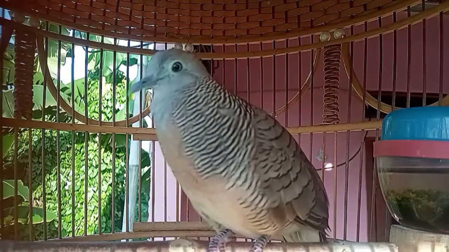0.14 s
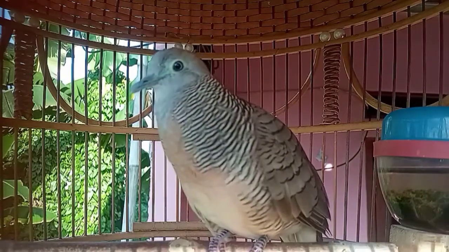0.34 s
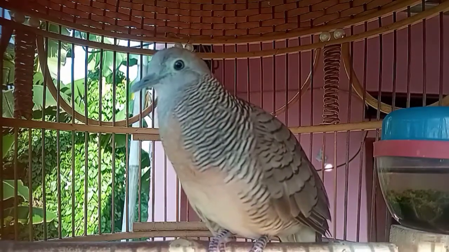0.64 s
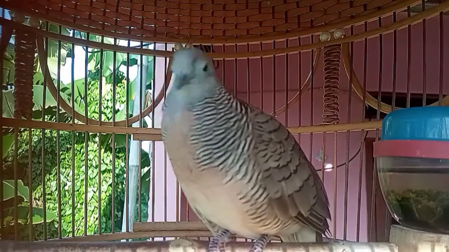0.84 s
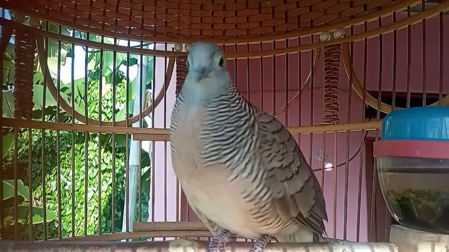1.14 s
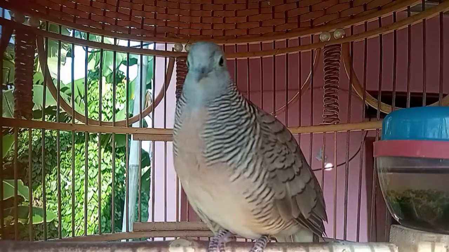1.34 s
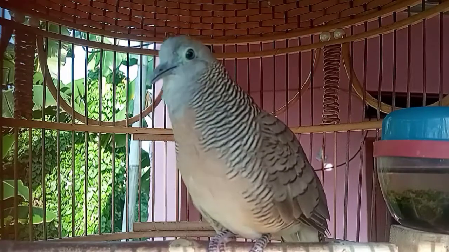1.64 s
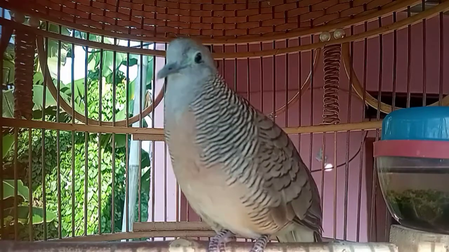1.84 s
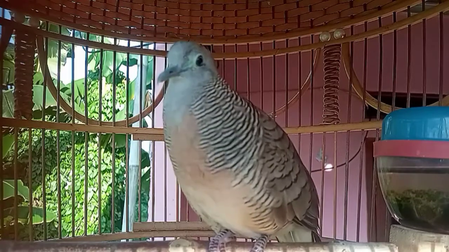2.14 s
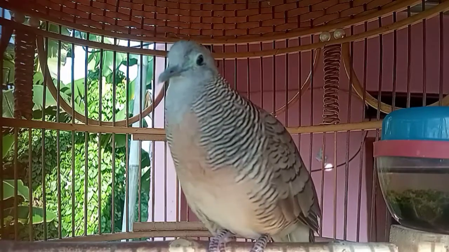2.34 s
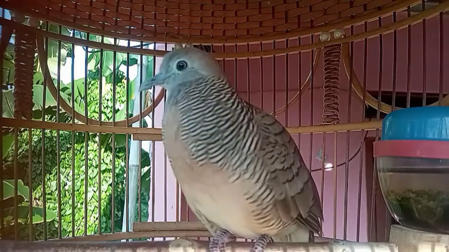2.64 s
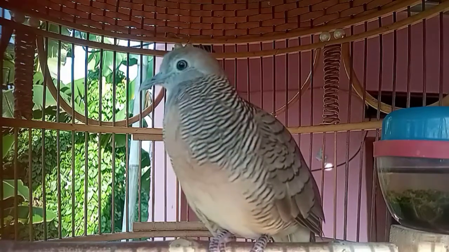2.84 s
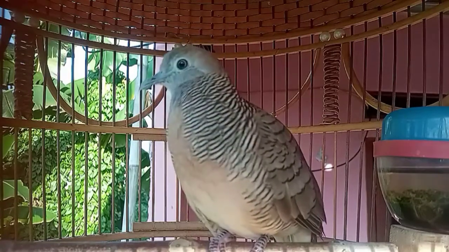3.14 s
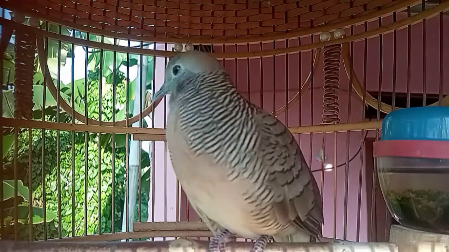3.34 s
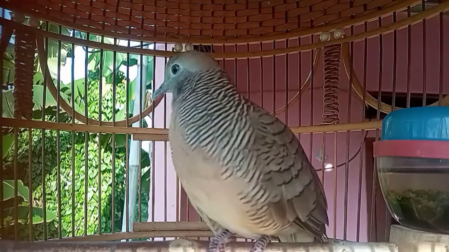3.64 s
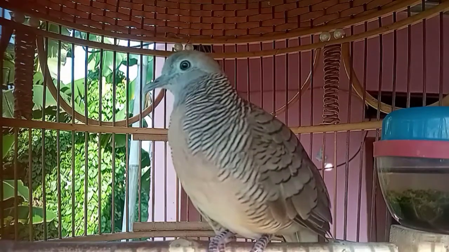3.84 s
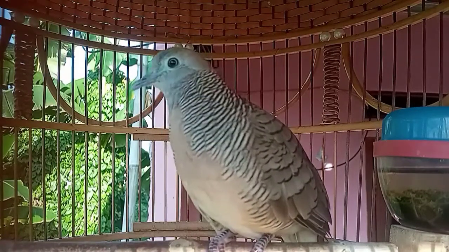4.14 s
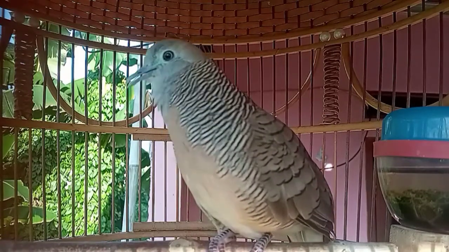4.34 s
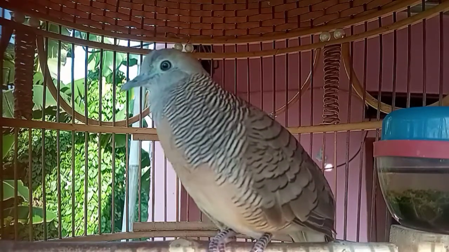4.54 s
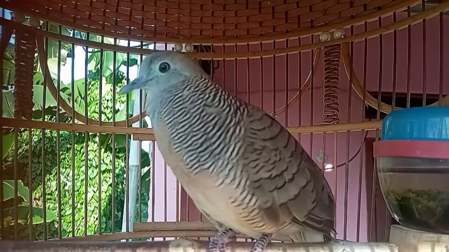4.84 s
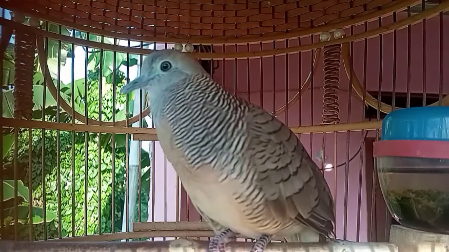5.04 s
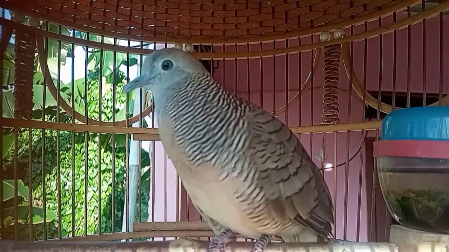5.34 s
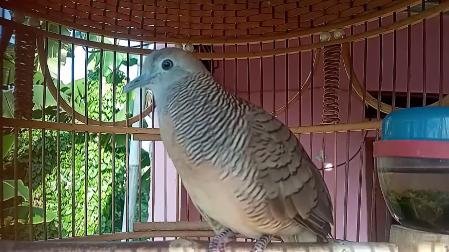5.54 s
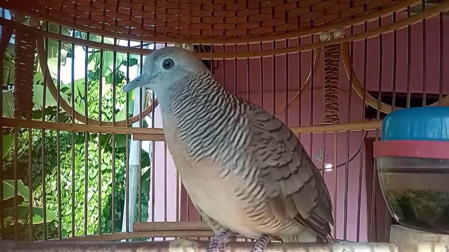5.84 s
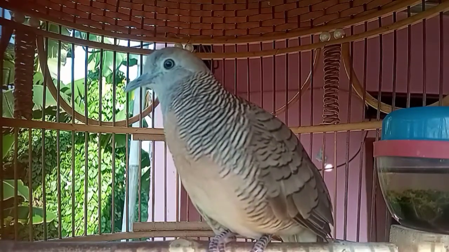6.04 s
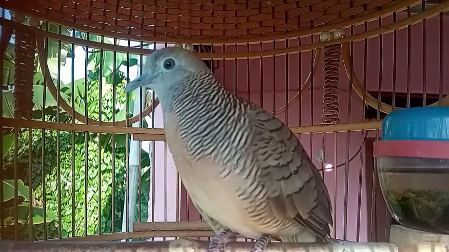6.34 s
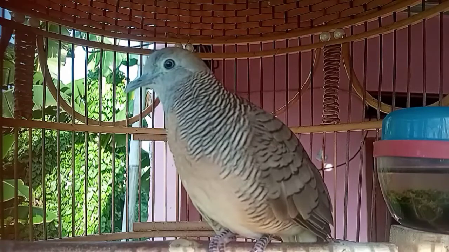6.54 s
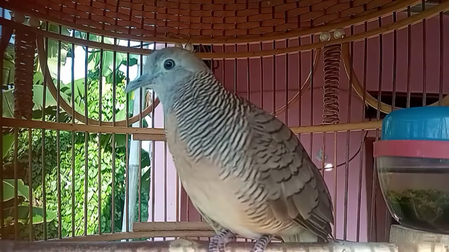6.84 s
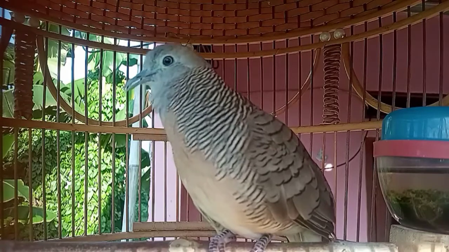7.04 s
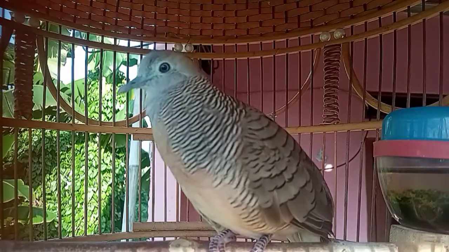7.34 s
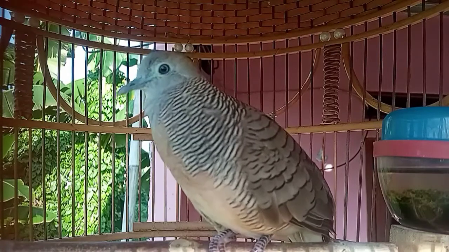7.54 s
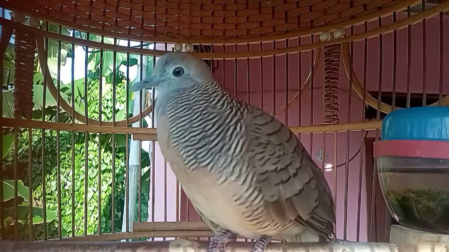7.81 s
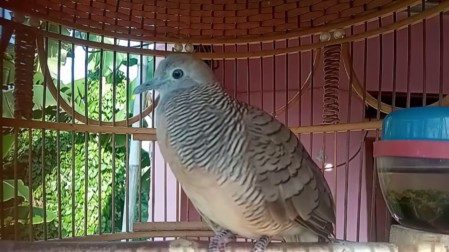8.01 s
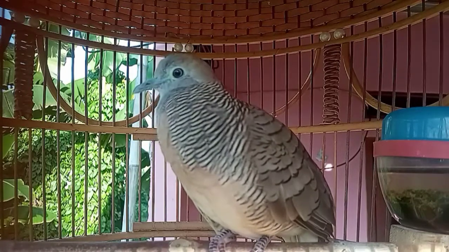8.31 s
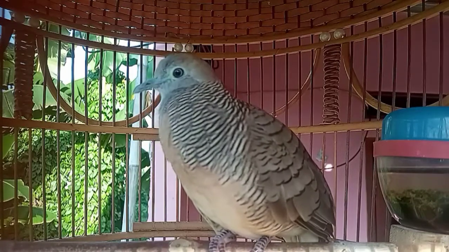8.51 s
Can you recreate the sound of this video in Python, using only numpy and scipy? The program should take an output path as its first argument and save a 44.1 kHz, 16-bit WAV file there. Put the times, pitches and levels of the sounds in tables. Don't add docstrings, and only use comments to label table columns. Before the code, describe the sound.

Under a porch, a caged zebra dove sings close to a stereo microphone: three clipped four-note phrases, each rising from a creak into a clear hollow tone. A neighbouring dove patters fast even coos before the first phrase and again after the second. Farther doves answer with echo, small birds chirp and twitter high up, two bands of cicadas buzz steadily, an engine hums far off, and the cage ticks lightly.

```python
import sys
import numpy as np
from scipy import signal
from scipy.fft import rfft, irfft, next_fast_len
from scipy.io import wavfile
from scipy.ndimage import uniform_filter1d, minimum_filter1d, map_coordinates

SR = 44100
rng = np.random.default_rng(int(sys.argv[2]) if len(sys.argv) > 2 else 0)


def attenuation_scalar(level_db):
    decades = np.asarray(level_db, float) / 20
    return 10 ** decades


def store_pcm(level_fs):
    pcm = np.round(np.clip(level_fs, -1, 1) * 32767).astype(np.int16)
    wavfile.write(sys.argv[1], SR, np.atleast_2d(pcm).T)


N = 382347

# (time [s], high cicada [dB], low choir [dB], engine [dB], yard [dB])
BEDS = [(0.0, -38, -44, -62, -91), (2.73, -38, -41.5, -51, -98), (3.33, -37.5, -44, -51, -95.5),
        (6.98, -38.5, -43.5, -54, -89), (8.67, -38, -45.5, -49.5, -86.5)]


def unit(x):
    return x / np.sqrt(np.mean(x ** 2) + 1e-20)


def along(points, hz):
    f, v = np.transpose(points)
    return np.interp(np.log(hz + 1), np.log(f + 1), v)


def curves(rows):
    s, *cols = np.transpose(rows)
    return [np.interp(np.arange(N) / SR, s, c) for c in cols]


def wobble(rate):
    knots = rng.standard_normal(int(N * rate / SR) + 4)
    return map_coordinates(knots, [np.arange(N) * rate / SR])


def filtered(x, response):
    m = next_fast_len(N + 8192)
    return irfft(rfft(x, m) * response(np.fft.rfftfreq(m, 1 / SR)), m)[..., :N]


def noise(spectrum, channels=1):
    white = rng.standard_normal((channels, N))
    return unit(filtered(white, lambda hz: attenuation_scalar(along(spectrum, hz))))


def patchy(spectrum, patchy_db):
    z = signal.stft(noise(spectrum, channels=2), nperseg=512)[2]
    field = uniform_filter1d(rng.standard_normal(z.shape[1:]), size=5, axis=0)
    field = uniform_filter1d(field, size=16, axis=1, mode="wrap")
    return signal.istft(z * attenuation_scalar(patchy_db * unit(field)), nperseg=512)[1][:, :N]


def ports(x, lag_ms, pan_db):
    lag_s = lag_ms / 1000 * np.array([[1], [-1]])
    panned = x * attenuation_scalar([[pan_db / 2], [-pan_db / 2]])
    return filtered(panned, lambda hz: np.exp(-1j * np.pi * hz * lag_s))


def echoes(x, wet_db, t60_scale, pan_db):
    # (frequency [Hz], t60 [s])
    porch_t60 = [(500, 0.042), (1300, 0.78), (4000, 0.85), (8000, 0.35)]
    hz, t, z = signal.stft(rng.standard_normal((2, SR // 2)), SR, nperseg=256)
    decay = attenuation_scalar(-60 * t / (t60_scale * along(porch_t60, hz)[:, None]))
    tail = signal.istft(z * decay, SR, nperseg=256)[1]
    delayed = np.pad(x, (250, 0))[None]
    wet = signal.fftconvolve(delayed, tail / np.linalg.norm(tail[0]), axes=1)[:, :N]
    return wet * attenuation_scalar([[wet_db + pan_db / 2], [wet_db - pan_db / 2]])


def dulled(x):
    return filtered(x, lambda hz: 1 / (1 + (hz / 1900) ** 6))


def yard():
    # (frequency [Hz], density [dB per Hz])
    engine_colour = [(15, -22), (25, -25), (107, 1), (133, 0.5), (194, -15.5), (300, -15), (390, -18.5),
                     (660, -120)]
    # (frequency [Hz], density [dB per Hz])
    yard_colour = [(120, -42), (200, 4), (437, -5.5), (864, -4), (1190, -4), (1490, -27), (3540, -5),
                   (5610, -9), (6430, -42.5), (8440, -55), (10500, 1), (11700, -21), (15200, -47.5),
                   (22000, -120)]
    engine_db, yard_db = curves(BEDS)[2:]
    throb = attenuation_scalar(0.82 * wobble(3.66) + 1.8 * wobble(8))
    hum = ports(noise(engine_colour) * throb, 0.8, 4.5)
    hum = hum + attenuation_scalar(-11.5) * noise(engine_colour, channels=2)
    rustle = patchy(yard_colour, patchy_db=4.5) * attenuation_scalar([[3.5], [-3.5]]) * attenuation_scalar(2.5 * wobble(7))
    return attenuation_scalar(engine_db) * hum + attenuation_scalar(yard_db + 30.5) * rustle


def near_cicada():
    # (frequency [Hz], density [dB per Hz])
    high_colour = [(4880, -106), (8300, -34), (9130, -16.5), (9390, -14.5), (10000, -8.5), (10300, 4.5),
                   (10900, -0.5), (11400, -29.5), (11700, -23.5), (15200, -49), (22000, -120)]
    pulse_hz = 122.8 * (1 + 0.015 * wobble(11.0) + 0.0071 * wobble(30.0))
    beat = np.cos(2 * np.pi * np.cumsum(pulse_hz) / SR)
    pulses = .4 + np.exp(1.9 * (beat - 1)) * attenuation_scalar(1.5 * wobble(40))
    buzz = unit(pulses * noise(high_colour))
    return ports(buzz, .61, -9) + attenuation_scalar(-9.5) * noise(high_colour, channels=2)


def far_choir():
    # (frequency [Hz], density [dB per Hz])
    low_colour = [(3470, -18.5), (5900, -6.5), (6030, 0), (6120, 0), (6210, -2), (6480, 15), (6680, 3),
                  (6890, -2.5), (7300, -10), (9490, -29), (16100, -120)]
    shimmer = attenuation_scalar(1.13 * wobble(60) + 2.96 * wobble(9.2))
    return noise(low_colour, channels=2) * attenuation_scalar([[4.5], [-8.5]]) * shimmer


def insect_whistle():
    # (time [s], overtones [dB], root [dB])
    whine_swells = [
        [(1.3, -63, -71), (2.3, -72, -90), (2.678, -60, -93), (3.1, -76, -80)],
        [(3.4, -68, -72.5), (3.55, -63, -77), (4.4, -63, -73.5)],
        [(5.5, -65.5, -104), (5.9, -59, -69), (6.6, -61, -46), (7.05, -92, -55)],
    ]
    # (time [s], overtones [dB], root [dB])
    whine_pauses = [(1.2, -80, -85), (3.25, -80, -85), (4.5, -80, -85), (5.4, -80, -85), (7.2, -80, -85)]
    # (multiple of the root [1], level [dB])
    whine_orders = [(8, 2), (9, -9), (10, -48), (11, -9)]
    overtone_db, root_db = curves(sorted(sum(whine_swells, whine_pauses)))
    root_hz = 639 * (1 + .007 * wobble(40))
    phase = 2 * np.pi * np.cumsum(root_hz) / SR
    whistle = sum(attenuation_scalar(db + 6 + 3 * wobble(18)) * np.sin(k * phase) for k, db in whine_orders)
    whistle = attenuation_scalar(overtone_db) * whistle
    whistle += attenuation_scalar(root_db - 4.5 + 14.6 * wobble(25)) * np.sin(phase + 2.0 * wobble(30))
    return echoes(whistle, 2.3, 0.94, 2.3)


def insects():
    high_db, low_db = curves(BEDS)[:2]
    return attenuation_scalar(high_db - 8.0) * near_cicada() + attenuation_scalar(low_db - 3.0) * far_choir() + insect_whistle()


def rising_chirps():
    # (time [s], length [s], level [dB])
    hook_steps = [(1.374, 0.046, -31), (1.933, 0.032, -31.5), (6.306, 0.035, -33.5), (6.865, 0.072, -27),
                  (7.432, 0.021, -27.5)]
    high_steps = [(0.857, 0.097, -36.5), (1.423, 0.062, -30), (1.986, 0.067, -32), (6.332, 0.1, -34),
                  (7.47, 0.075, -29.5)]
    mid_steps = [(1.03, .105, -40), (1.6, .085, -38), (6.55, .075, -36), (7.09, .075, -36)]
    low_steps = [(1.212, 0.11, -45), (1.792, 0.058, -42.5), (6.718, .072, -39), (7.272, 0.051, -38)]
    short_steps = [(6.935, 0.067, -27.5)]
    # (start [Hz], end [Hz], warble [Hz], lateness of the leap [1])
    step_shapes = [
        (6000, 6750, 200, 2.2),
        (5550, 7650, 240, 2.4),
        (4400, 6000, 220, 4),
        (2870, 4050, 110, 3.5),
        (5900, 7050, 240, 2.4),
    ]
    kinds = [hook_steps, high_steps, mid_steps, low_steps, short_steps]
    return [(s, length, start_hz, end_hz, db, warble_hz, late)
            for rows, (start_hz, end_hz, warble_hz, late) in zip(kinds, step_shapes)
            for s, length, db in rows]


def falling_chirps():
    # (time [s], length [s], start [Hz], level [dB])
    twitter = [(2.074, 0.048, 7000, -36), (2.133, 0.04, 6760, -38), (2.196, 0.024, 6700, -37),
               (2.247, 0.069, 6560, -40), (2.287, 0.05, 6680, -43), (2.339, 0.085, 6870, -52),
               (2.383, 0.05, 6850, -38.5), (2.448, 0.048, 6740, -35.5), (2.53, 0.074, 6740, -47),
               (5.14, 0.05, 6700, -54), (5.19, 0.059, 6780, -40.5), (5.269, 0.025, 6740, -38.5),
               (5.338, 0.037, 6840, -37), (5.36, 0.064, 6710, -41.5), (5.508, 0.033, 6800, -36.5),
               (5.562, 0.042, 6800, -35), (5.606, 0.022, 6800, -49), (5.677, 0.046, 6970, -36.5),
               (5.725, 0.034, 7010, -36.5), (5.756, 0.071, 6640, -41.5), (5.832, .05, 6840, -52)]
    chatter = [(2.08, 0.035, 3920, -43), (2.295, 0.14, 3850, -47.5), (2.401, 0.082, 4000, -43.5),
               (2.586, 0.1, 4020, -42), (2.804, 0.08, 3740, -46), (3.078, 0.068, 3760, -46),
               (6.081, 0.036, 4010, -46.5), (6.26, 0.039, 3380, -46.5), (2.95, 0.13, 4000, -61),
               (2.7, 0.11, 3760, -53), (7.915, 0.028, 3660, -45), (8.418, 0.039, 3670, -44)]
    held = [(0.495, 0.77, 4270, -61.5), (1.133, 0.096, 4430, -71), (1.249, 1, 5010, -59),
            (4.705, 0.19, 5390, -57), (7.761, 0.19, 4075, -55.5)]
    gliding = [(6.182, 0.052, 4126, -34)]
    # (drop [Hz], more drop [Hz per s of length], warble [Hz], lateness [1])
    fall_shapes = [
        (459, 23000, 398, 1.4),
        (294, 5900, 185, 1),
        (104.4, 60.3, 1.7, 0.74),
        (199.3, 5050, 21, 0.89),
    ]
    short_warble = 1.9
    falls = []
    for rows, (drop_hz, hz_per_s, warble_hz, late) in zip([twitter, chatter, held, gliding], fall_shapes):
        for s, length, hz, db in rows:
            end_hz = hz - drop_hz - hz_per_s * length
            shake_hz = warble_hz + short_warble / length * (rows is held)
            falls.append((s, length, hz, end_hz, db, shake_hz, late))
    return falls


def small_birds():
    song, flutter = np.zeros(N), wobble(260)
    for s, length, start_hz, end_hz, db, warble_hz, late in rising_chirps() + falling_chirps():
        t = np.arange(round(length * SR)) / SR
        first = round(s * SR)
        sweep = np.tanh(1.6 * (t / length) ** late)
        pitch = start_hz + (end_hz - start_hz) * sweep
        pitch = pitch + warble_hz * (0.29 + sweep) * flutter[first:][:len(t)]
        lean = 1.8 if end_hz > start_hz else 1
        swell = np.sin(np.pi * (t / length) ** lean) ** 0.5
        song[first:][:len(t)] += attenuation_scalar(db) * swell * np.sin(2 * np.pi * np.cumsum(pitch) / SR)
    return ports(song, -0.34, 13.0) * attenuation_scalar(-6.0) + echoes(song, -0.081, 0.65, 6.9)


def snaps(rows, gain_db, colour):
    ticks, t = np.zeros((2, N + SR)), np.arange(1500) / SR
    for (s, db), pan_db in zip(rows, rng.normal(0, 3.3, len(rows))):
        decay = attenuation_scalar(-60 * t / .008) + attenuation_scalar(-12 - 60 * t / .06)
        snap = rng.standard_normal((2, len(t))) * decay
        ticks[:, round(s * SR):][:, :len(t)] += attenuation_scalar(db + gain_db) * attenuation_scalar([[pan_db], [-pan_db]]) * snap
    return filtered(ticks[:, :N], lambda hz: attenuation_scalar(along(colour, hz)))


def cage():
    # (time [s], peak [dB])
    claw_ticks = [(0.2713, -42), (0.406, -48), (0.7023, -42.5), (0.834, -44.5), (0.922, -44), (1.1119, -69),
                  (1.272, -62), (1.4376, -43.5), (1.482, -46.5), (1.5753, -59), (1.6661, -53),
                  (2.3416, -66), (2.8045, -54), (2.943, -70), (3.039, -59), (3.1797, -63), (3.3957, -63),
                  (3.7653, -44), (3.928, -41), (4.6384, -60.5), (4.8726, -61), (5.586, -41),
                  (5.7558, -68.5), (6.1365, -50), (6.314, -65), (6.357, -42), (6.7047, -47), (6.8698, -62),
                  (7.0549, -44.5), (7.4954, -58), (7.5647, -53), (8.0306, -44), (8.334, -48), (8.4677, -44),
                  (8.5889, -57), (8.6253, -44)]
    # (frequency [Hz], level [dB])
    tick_colour = [(3000, -45), (7000, -26), (10500, -18), (12500, -5), (15000, 2), (16000, -14)]
    # (time [s], peak [dB])
    tick_bodies = [(0.2724, -56), (0.419, -48), (0.9327, -43.5), (1.485, -41), (3.93, -40.5), (5.587, -45.5),
                   (6.7146, -42.5), (7.066, -47), (8.6336, -42.5)]
    # (frequency [Hz], level [dB])
    body_colour = [(1200, -35), (2500, -7.5), (5000, -2.5), (6500, 3.5), (9000, -14.5), (12000, -22)]
    return snaps(claw_ticks, 10, tick_colour) + snaps(tick_bodies, 18.5, body_colour)


def throat(modes):
    def response(f):
        return sum((-1) ** k * attenuation_scalar(db / 2) * 1j * f * w / (c * c - f * f + 1j * f * w)
                   for k, (c, w, db) in enumerate(modes)) ** 2
    return response


def notes(rows, start_hz, sag_hz):
    return [(s, length, start_hz, top_hz, top_hz - sag_hz, db) for s, length, top_hz, db in rows]


def dove(sung_notes, modes, s_per_octave, bright_hz, lead_s=0, clicks=(), settle=0.14,
         attack_s=0.00071, glide=0.49, bend=2):
    pitch, effort = np.full(N, 600.), np.zeros(N)
    for s, length, start_hz, top_hz, end_hz, db in sung_notes:
        t = np.arange(round((length + lead_s) * SR)) / SR
        left = t[::-1]
        climb = np.log2(top_hz / start_hz) - np.maximum(t - 1.4 * lead_s, 0) / s_per_octave
        gap = .1 * np.log1p(np.exp(climb / .1))
        gap = gap + settle * np.exp(np.minimum(climb, 0) * s_per_octave / .016) * (climb[0] > .2)
        sag = glide * (t / t[-1]) ** bend + (1 - glide) * np.exp(-left / .012)
        dip_hz = 60 * np.exp(-((left - .036) / .01) ** 2) - 50 * np.exp(-((left - .016) / .008) ** 2)
        dip_hz = dip_hz * (start_hz < 300)
        first = round((s - lead_s) * SR)
        span = slice(first, first + len(t))
        pitch[span] = 1.03 * top_hz * 2 ** -gap - (top_hz - end_hz) * sag - dip_hz
        hum_db = -11 * (t < 1.5 * lead_s)
        effort_db = db + 13.5 + 0.5 * np.minimum(gap, 1) + 0.02 * dip_hz + hum_db
        attack = 1 - (s > 0) * np.exp(-t / attack_s)
        effort[span] = attenuation_scalar(effort_db) * attack * (1 - np.exp(-left / 0.0041))
    sung = np.flatnonzero(effort)
    pitch = np.interp(np.arange(N), sung, pitch[sung])
    pitch = uniform_filter1d(pitch, size=150) * (1 + .004 * wobble(60))
    effort = uniform_filter1d(uniform_filter1d(effort, size=200), size=200) * attenuation_scalar(.8 * wobble(70))
    on = effort > 0
    phase = 2 * np.pi * np.cumsum(pitch)[on] / SR
    pulses = np.zeros(N)
    pulses[on] = sum(np.cos(k * phase) / (1 + (k * pitch[on] / bright_hz) ** 4) for k in range(1, 11))
    pulses *= effort * pitch / 1200
    for s, db in clicks:
        pulses[round(s * SR):][:28] += attenuation_scalar(db + 10) * np.hanning(28)
    return filtered(pulses, throat(modes))


def low_far_dove():
    # (time [s], length [s], top pitch [Hz], level [dB])
    low_coos = [
        (2.12, 0.11, 814, -71.5),
        (6.27, 0.036, 811, -52),
        (6.34, 0.037, 783, -64),
        (6.82, 0.053, 760, -57),
    ]
    low = dove(notes(low_coos, 560, 32), [(710, 790, 11.2), (1630, 460, 2.0)], 0.017, 2000)
    return echoes(low, -5.5, 2.15, 4.7)


def mid_far_dove():
    # (time [s], length [s], top pitch [Hz], level [dB])
    mid_opening = [(2.697, .092, 1328, -33)]
    mid_coos = [(2.8, 0.02025, 1297, -40), (2.87, 0.03, 1350, -34), (2.945, 0.0156, 1352, -27.5),
                (3.025, 0.044, 1353, -32.5), (3.525, 0.046, 1302, -32), (3.6, 0.04, 1320, -39),
                (4.2, 0.041, 1205, -55.5), (6.625, 0.027, 1300, -36.5), (6.73, 0.033, 1200, -34.5),
                (6.795, 0.0352, 1250, -37), (6.872, 0.027, 1161, -34.5), (8.35, 0.19, 1200, -59.5),
                (8.46, 0.14, 1136, -59.5)]
    mid_swells = [(3.128, 0.099, 1317, -30), (3.322, 0.089, 1321, -28.5)]
    # (frequency [Hz], width [Hz], level [dB])
    mid_throat = [(1325, 566, -5), (1135, 325, -1), (4020, 1120, -22)]
    coos = notes(mid_opening, 352, 62) + notes(mid_coos, 1100, 65)
    mid = dove(coos, mid_throat, 0.026, 4200, settle=.05, attack_s=0.0027)
    swells = dove(notes(mid_swells, 1150, 29), mid_throat, 0.0747, 2860, settle=0, attack_s=0.014)
    direct = ports(mid + swells * attenuation_scalar(3), 1.2, 7)
    return direct + echoes(mid * attenuation_scalar(-5.5) + swells * attenuation_scalar(-12), 0, 0.8, 8.3)


def high_far_dove():
    # (time [s], length [s], top pitch [Hz], level [dB])
    high_ending = [(0.0075, 0.035, 1400, -56)]
    high_coos = [(.645, 0.039, 1400, -44.5), (.83, 0.065, 1391, -41.5), (1.02, 0.051, 1476, -38),
                 (1.222, 0.066, 1423, -40), (1.43, 0.068, 1460, -42.5), (1.62, 0.045, 1535, -43.5),
                 (1.85, 0.088, 1425, -40.5)]
    high_openings = [(.27, 0.041, 1466, -37), (6.59, 0.028, 1394, -26.5)]
    turned_coos = [(6.97, 0.049, 1400, -34.5), (7.34, 0.051, 1440, -30), (7.54, 0.074, 1433, -33),
                   (7.73, 0.087, 1438, -32), (7.95, 0.088, 1442, -32), (8.165, 0.081, 1449, -32.5)]
    # (frequency [Hz], width [Hz], level [dB])
    away_throat = [(1400, 820, -5), (1207, 440, 1), (4270, 1700, -20)]
    turned_throat = [(1386, 720, -8.5), (1154, 90, 7), (4310, 830, -13.5)]
    high = dove(notes(high_ending, 1420, 93.8) + notes(high_coos, 1300, 150), away_throat, 0.033, 4000)
    turned = dove(notes(high_openings, 500, 181.6), away_throat, 0.014, 3200)
    turned = turned + dove(notes(turned_coos, 910, 135), turned_throat, 0.015, 2940,
                           settle=0.011, attack_s=0.0059, glide=.9, bend=1)
    direct = ports(high * attenuation_scalar(-2.5) + turned * attenuation_scalar(-3.5), 1.3, 7)
    return direct + echoes(high + turned * attenuation_scalar(-3), -2.0, 0.5, 5.8)


def neighbour_dove():
    # (time [s], length [s], top pitch [Hz], level [dB])
    first_coo = [(.03, .056, 1173, -25)]
    patter = [(.171, 0.068, 1203, -25.5), (.324, 0.073, 1218, -24.5), (.479, 0.078, 1197, -24.5),
              (.643, 0.072, 1209, -23.5), (.807, 0.068, 1201, -23), (.985, 0.067, 1199, -24.5),
              (1.187, 0.057, 1195, -23.5), (1.336, 0.055, 1195, -23.5), (4.857, 0.12, 1184, -20.5),
              (4.97, 0.052, 1178, -24.5), (5.031, 0.018, 1156, -23), (5.102, 0.037, 1147, -29),
              (5.166, 0.025, 1207, -23.5), (5.243, 0.033, 1199, -24.5), (5.334, 0.033, 1223, -25.5),
              (5.448, 0.055, 1211, -24), (5.612, 0.055, 1212, -24.5), (5.777, 0.064, 1199, -23.5),
              (5.936, 0.058, 1191, -23.5), (6.088, 0.059, 1187, -24.5), (6.261, 0.052, 1201, -24.5),
              (6.424, 0.0624, 1198, -25.5)]
    # (frequency [Hz], width [Hz], level [dB])
    neighbour_throat = [(847, 178, -19), (990, 60, 4), (1170, 220, -4), (4500, 1500, -36), (2340, 300, -14)]
    near = dove(notes(first_coo, 1150, 150) + notes(patter, 900, 200), neighbour_throat, 0.016, 1007,
                lead_s=0.011, settle=.1, attack_s=0.0017, glide=.5, bend=2.0)
    return ports(near, 1.03, 3) + echoes(dulled(near), -9.5, 0.86, 5.8)


def caged_dove():
    # (time [s], slowness [1], level [dB])
    phrases = [
        (1.652, 1.077, 0),
        (4.343, 1, .6),
        (7.05, 1.057, -.4),
    ]
    # (length [s], top pitch [Hz], end pitch [Hz], level [dB])
    phrase_notes = [
        (0.1394, 1345, 1120, -18),
        (.042, 1370, 1090, -17.5),
        (.039, 1360, 1000, -19),
        (.104, 1330, 1090, -19),
    ]
    note_times = [-.005, .141, .204, .293]
    note_starts = [275.5, 895, 897, 703]
    # (time [s], length [s], top pitch [Hz], level [dB])
    caged_ending = [(0, 0.032, 1300, -17)]
    # (frequency [Hz], width [Hz], level [dB])
    caged_throat = [(1325, 514, 2.5), (1750, 130, -31), (1136, 330, -25.5), (4160, 460, -15),
                    (2510, 410, -5.5), (6950, 2700, -5.5)]
    # (frequency [Hz], width [Hz], level [dB])
    sac_ring = (990, 50, 3)
    song, clicks = notes(caged_ending, 1310, 190), []
    for s, slow, phrase_db in phrases:
        clicks.append((s - .035, -30.5 + phrase_db))
        for at, start_hz, (length, top_hz, end_hz, db) in zip(note_times, note_starts, phrase_notes):
            sung_s = length if at > 0 else slow * length
            song.append((s + slow * at, sung_s, start_hz, top_hz, end_hz, phrase_db + db))
    caged = dove(song, caged_throat, 0.018, 882, clicks=clicks, settle=0.17, attack_s=.003,
                 glide=0.67, bend=3.0)
    thin_hz = 880
    caged = attenuation_scalar(4.0) * filtered(
        caged, lambda hz: ((1j * hz) ** 2 / (thin_hz ** 2 - hz ** 2 + 1.4j * hz * thin_hz)) ** 2)
    ring_hz, ring_width, ring_db = sac_ring
    caged = caged + filtered(caged, lambda f: attenuation_scalar(ring_db) * 1j * f * ring_width
                             / (ring_hz ** 2 - f * f + 1j * f * ring_width))
    return ports(caged, 1.04, 4) + echoes(dulled(caged), -18.5, 0.6, 2.5)


def scene():
    background = yard() + insects() + small_birds() + cage()
    far_doves = low_far_dove() + mid_far_dove() + high_far_dove()
    return background + far_doves + neighbour_dove() + caged_dove()


def top_cut(x):
    return signal.sosfilt(signal.butter(12, 15830, fs=SR, output="sos"), x)


def record(dry):
    knee_db, squeeze = -24, 0.51
    level_db = 10 * np.log10(np.abs(uniform_filter1d(np.mean(dry ** 2, 0), size=1300)) + 1e-9)
    cut_db = minimum_filter1d(-squeeze * np.maximum(level_db - knee_db, 0), size=2000)
    ducked = dry * attenuation_scalar(6.5 + uniform_filter1d(cut_db, size=2000))
    return top_cut(ducked)


dry = scene()
out = record(dry)
store_pcm(out)
```